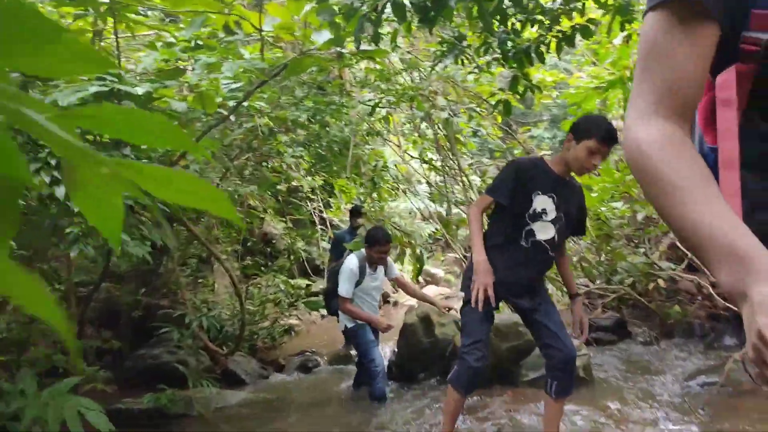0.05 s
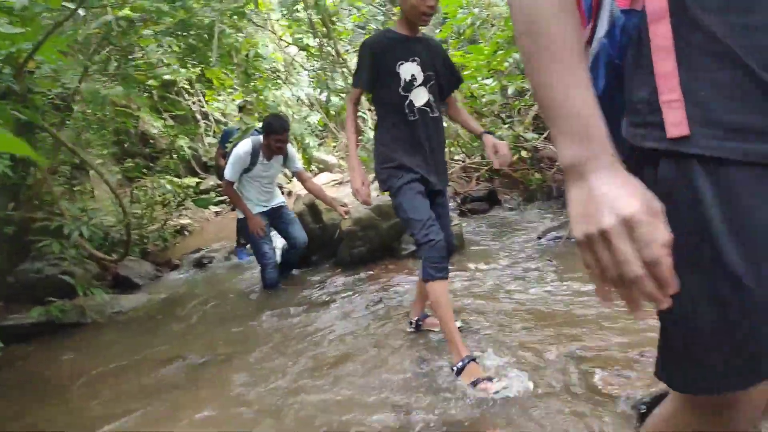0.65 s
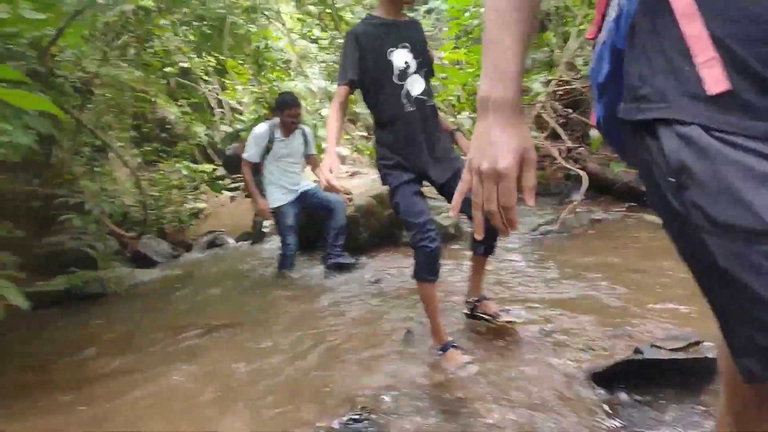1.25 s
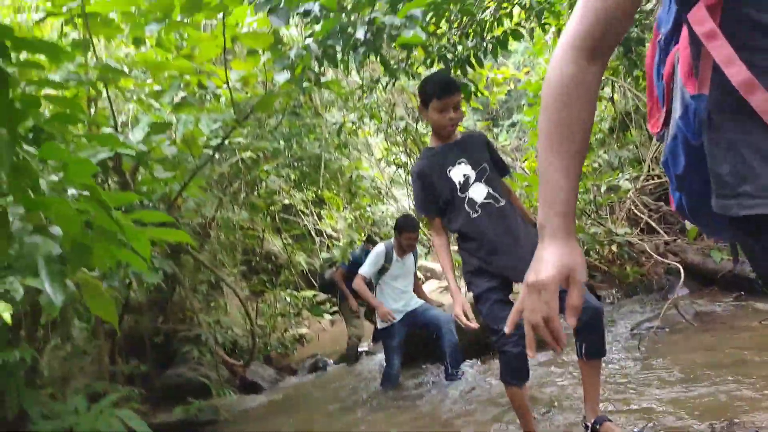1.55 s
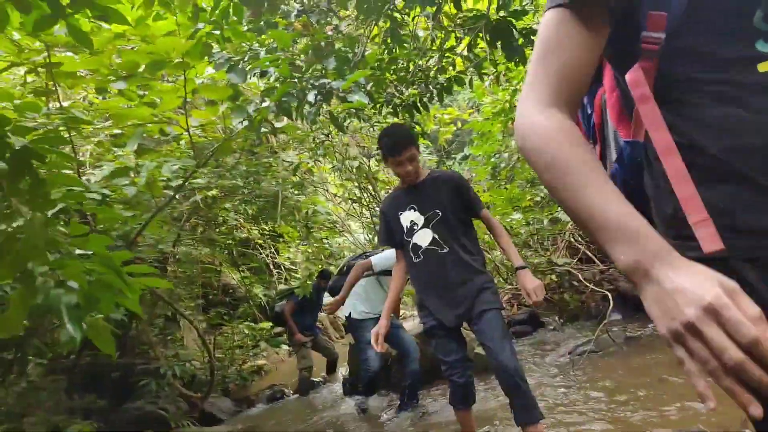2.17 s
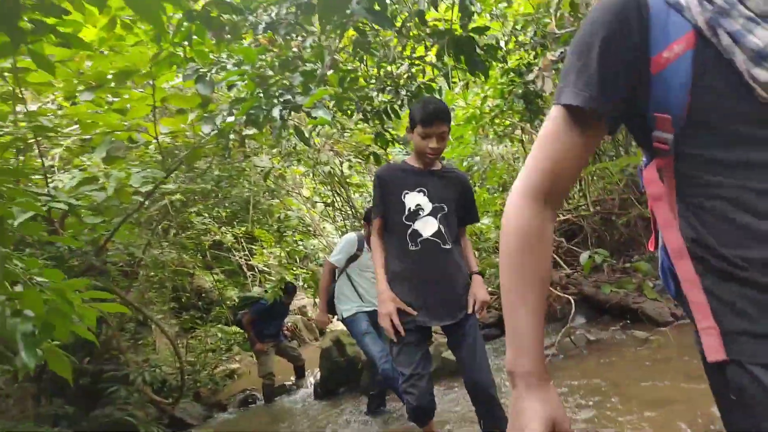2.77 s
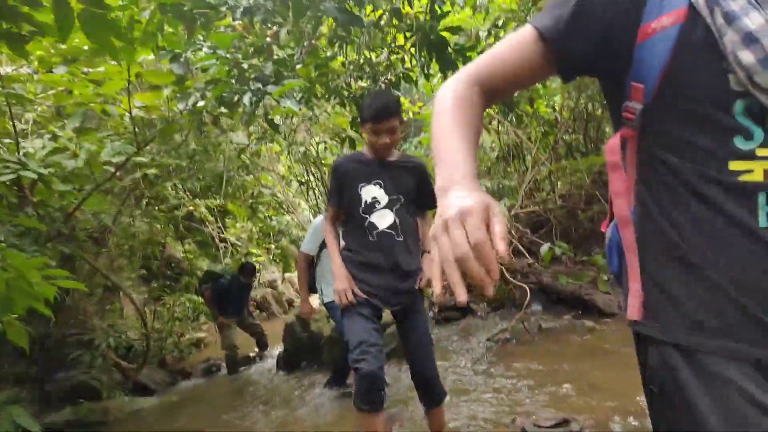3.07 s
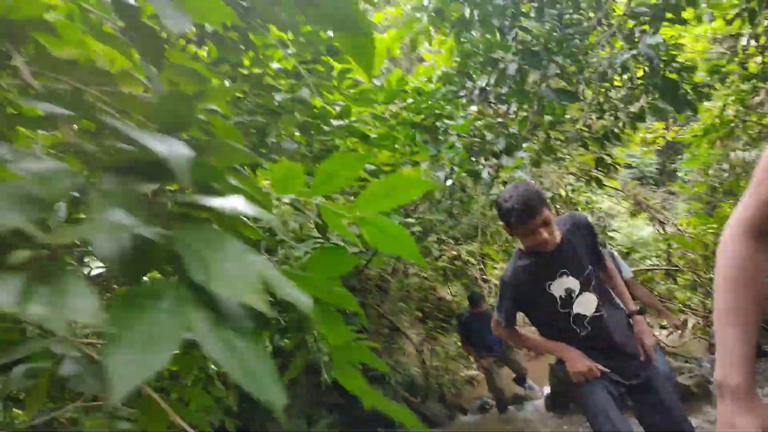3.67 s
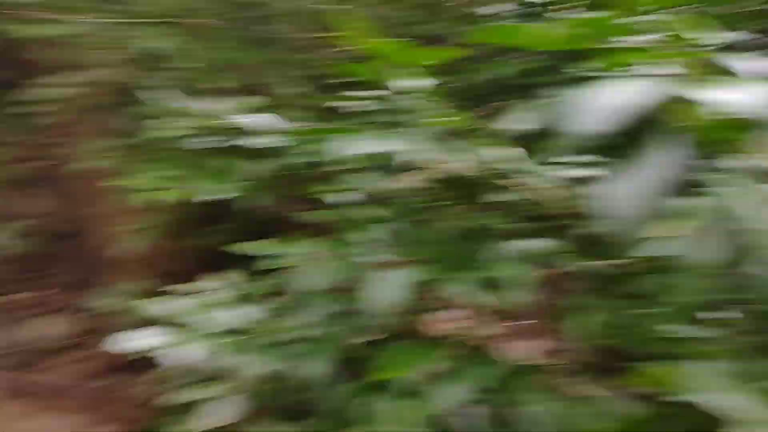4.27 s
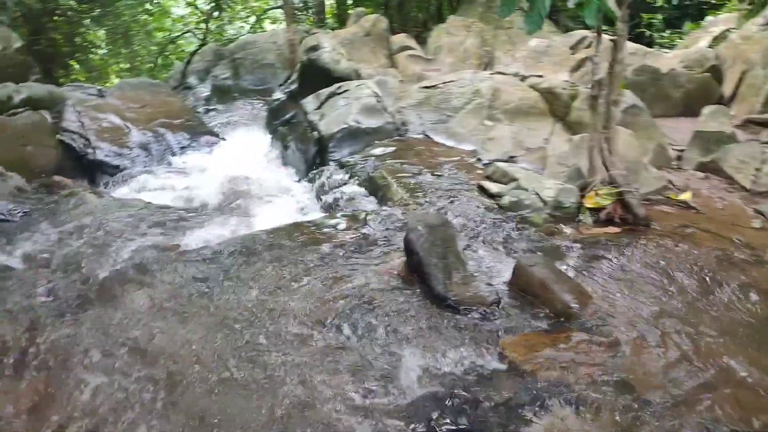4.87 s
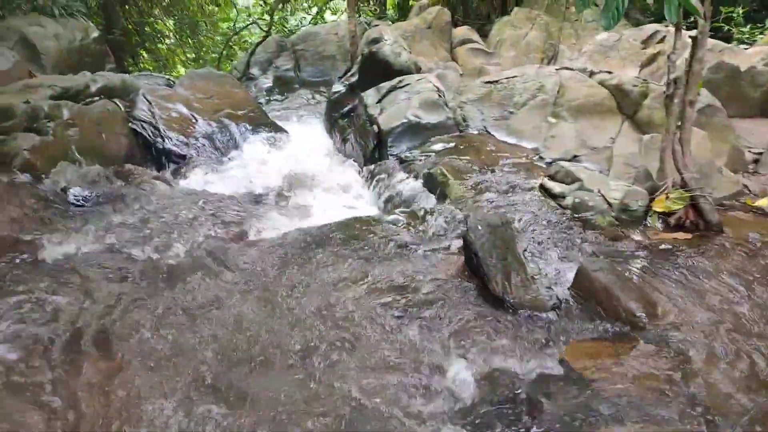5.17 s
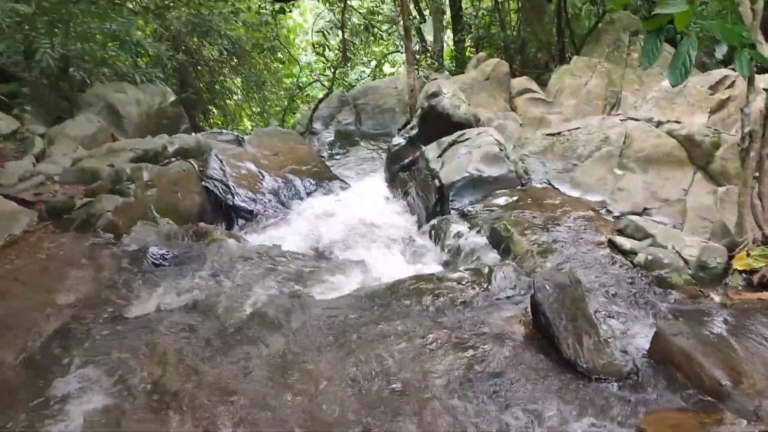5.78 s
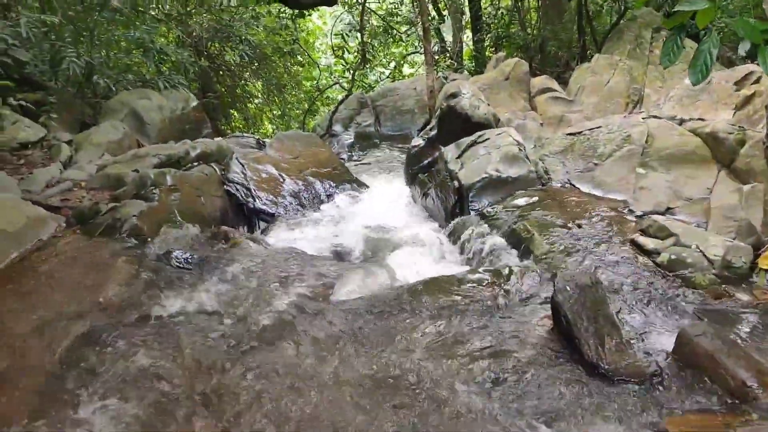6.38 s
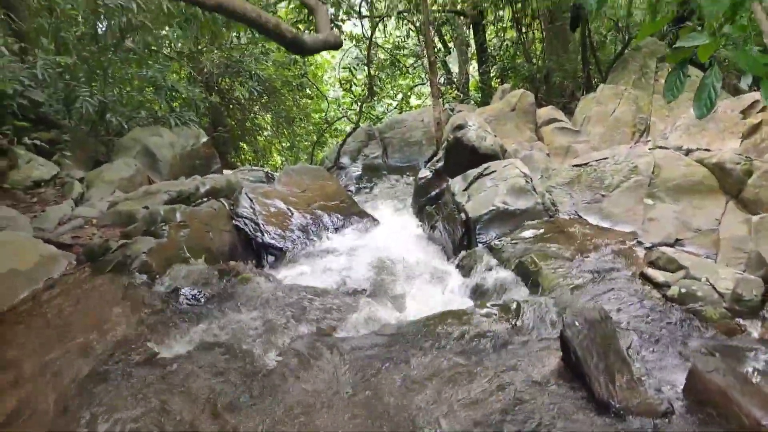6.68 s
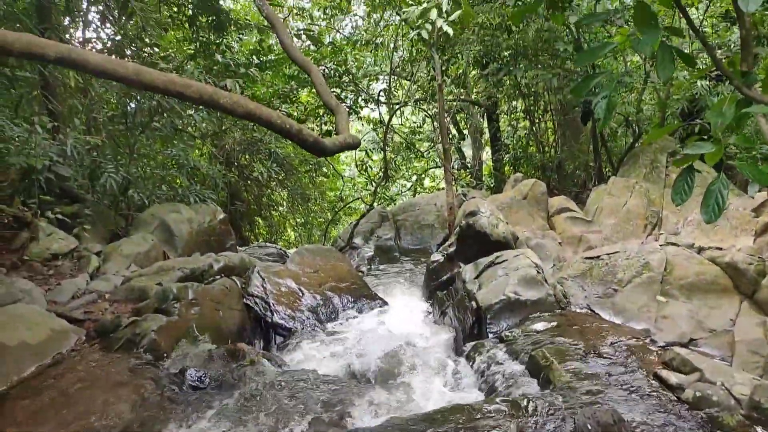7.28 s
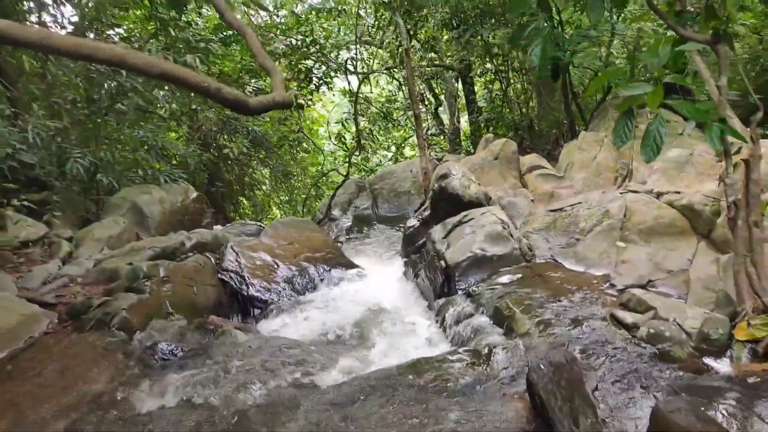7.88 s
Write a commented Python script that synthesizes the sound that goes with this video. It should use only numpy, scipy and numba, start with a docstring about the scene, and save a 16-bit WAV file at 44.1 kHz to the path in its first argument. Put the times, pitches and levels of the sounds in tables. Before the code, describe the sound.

A shallow forest stream pours over rocks into a small pool for about eight seconds, heard from the bank in wide stereo. Throughout, white water makes a steady, fizzing hiss, riffles babble over stones, and the fall plunges with a low, lumpy rumble slightly to the right. Tiny bubbles burst with short, high plinks and single drops tick close by, scattered from start to end. A low gulp comes just before 1 second, and then the whole sound cuts out for under a tenth of a second. Gurgles and hollow gulps cluster from about 2.2 to 3.8 seconds as the flow surges. Between 3 and 4.7 seconds the microphones turn toward the fall, and the water becomes slightly brighter and fuller. More gulps with soft thuds come around 4.7 to 5.2 seconds and again from 6.6 to 7.5, while the rushing continues to the end.

```python
"""A forest stream bank, where shallow water drops over rocks into a small pool.
Turbulence rumbles; ringing bubbles make the foam's hiss, the riffles' babble and the fall's plunge,
gurgles and gulps. Close by, small bubbles burst and single drops tick.
Halfway through, the microphones turn toward the fall and the foam brightens.
They are cross-fed into a wide stereo image; the sound cuts out once for an instant."""
import sys
import numpy as np
from scipy import signal
from scipy.fft import rfft, irfft, next_fast_len
from scipy.io import wavfile
from numba import njit

SR = 44100
rng = np.random.default_rng(int(sys.argv[2]) if len(sys.argv) > 2 else 0)


def put_to_file(sound):
    """Save the sound as 16-bit audio at rate SR, in the file named by the first command-line argument."""
    columns = np.atleast_2d(sound).T  # one column per channel
    safe = np.clip(columns, -1, 1)
    whole_steps = np.round(safe * 32767)
    wavfile.write(sys.argv[1], SR, whole_steps.astype(np.int16))


N = 354431
TIME_S = np.arange(N) / SR
FFT_SIZE = next_fast_len(N + 4096)
FREQ_HZ = np.maximum(np.arange(FFT_SIZE // 2 + 1) * SR / FFT_SIZE, 1)


def from_db(db):
    """Decibels to gain."""
    return 10 ** (np.asarray(db) / 20)


def unit_rms(x):
    """Scale to unit power."""
    return x / np.sqrt(np.mean(x ** 2) + 1e-20)


def over_time(points):
    """Breakpoints interpolated at every sample."""
    return np.interp(TIME_S, *np.transpose(points))


def over_hz(points):
    """Breakpoints interpolated on a log-frequency axis."""
    hz, value = np.transpose(points)
    return np.interp(np.log(FREQ_HZ), np.log(hz), value)


def peaks_db(rows):
    """Response of a set of resonances or dips."""
    return sum(db / (1 + (2 * (FREQ_HZ - hz) / width_hz) ** 2) for hz, width_hz, db in rows)


def colour(x, curve_db):
    """Filter by a decibel curve."""
    return irfft(rfft(x, FFT_SIZE) * from_db(curve_db), FFT_SIZE)[..., :N]


def band(x, hz, width_oct):
    """Band-pass around a pitch; unit power."""
    edges_hz = np.minimum(hz * 2 ** (np.array([-.5, .5]) * width_oct), .45 * SR)
    return unit_rms(signal.sosfilt(signal.butter(2, edges_hz, "band", fs=SR, output="sos"), x))


def drift(rate_hz):
    """Slow random wander; unit power."""
    spectrum = rfft(rng.standard_normal(FFT_SIZE)) / (1 + (FREQ_HZ / rate_hz) ** 2)
    return unit_rms(irfft(spectrum, FFT_SIZE)[:N])


def swell(start_s, db, rise_s):
    """Envelope that builds for `rise_s`, then settles."""
    age = np.maximum(TIME_S - start_s, 0) / rise_s
    return from_db(db) * age * np.exp(1 - age)


@njit
def ring_bubbles(starts, sides, pitches, heights, lives, rises):
    """Decaying sines, each gliding up as its bubble nears the surface; time in samples."""
    out = np.zeros((2, N))
    for k in range(len(starts)):
        phase, height = 0., heights[k]
        fade = np.exp(-np.log(1000) / lives[k])
        for i in range(min(int(lives[k]), N - starts[k])):
            out[sides[k], starts[k] + i] += height * np.sin(phase)
            phase += 2 * np.pi * pitches[k] * (1 + rises[k] * i / lives[k])
            height *= fade
    return out


def bubbles(per_s, low_hz, high_hz, cycles, spread_db, rise):
    """Swarm of random-sized bubbles, as strong per Hz as unit white noise within its range."""
    when, side, size, strength, life, glide = rng.random((int(per_s * N / SR), 6)).T
    starts, sides = (when * N).astype(np.int64), (side * 2).astype(np.int64)
    hz = low_hz * (high_hz / low_hz) ** size
    heights = hz * from_db(spread_db * np.minimum(-np.log(1 - strength), 4))
    lives = cycles * (.5 + life) * SR / hz
    swarm = ring_bubbles(starts, sides, hz / SR, heights, lives, rise * glide)
    return unit_rms(swarm) * np.sqrt(2 * (high_hz - low_hz) / SR)


def water(near, near_db, curve_db, churn_db, churn_hz):
    """Near bubbles over the blur of far ones, swelling together as the flow churns; unit power."""
    blend = rng.standard_normal((2, N)) + from_db(near_db) * near
    return unit_rms(colour(blend, curve_db) * from_db(churn_db * drift(churn_hz)))


def close_bubbles(rows, swell_cycles, cycles, rise, rough):
    """Single bubbles swell, ring and glide up, jostled by the current, each at one microphone."""
    out = np.zeros((2, N))
    sides = rng.integers(0, 2, len(rows))
    for (start_s, db, hz), side in zip(rows, sides):
        start = int(start_s * SR)
        turns = np.arange(min(int(cycles * SR / hz), N - start)) * hz / SR
        envelope = (1 - np.exp(-turns / swell_cycles)) ** 2 * np.exp(-np.log(1000) * turns / cycles)
        jolts = rough * rng.standard_normal((2, 64))   # one per cycle
        gain_jitter, phase_jitter = (np.interp(turns, np.arange(64), j) for j in jolts)
        phase = 2 * np.pi * turns * (1 + rise * turns / cycles) + phase_jitter
        tone = (1 + gain_jitter) * np.sin(phase)
        out[side, start:start + len(turns)] += from_db(db) * envelope / envelope.max() * tone
    return out


# pool turbulence spectrum: f/Hz, level/dB
RUMBLE_SPECTRUM = [(20, -24), (40, -7), (65, 7), (95, 16), (130, 2), (250, -13)]
def rumble(surge_db, thuds):
    """Turbulence in the pool makes a lumpy bass that follows the flow and heaves with each thud."""
    bass = colour(rng.standard_normal((2, N)), over_hz(RUMBLE_SPECTRUM))
    lumps = from_db(1.6 * drift(rate_hz=8.8))
    return np.hypot(from_db(-78.5 + 1.1 * surge_db), thuds) * unit_rms(bass * lumps)


# foam spectrum: f/Hz, level/dB
FOAM_SPECTRUM = [(1200, -20), (2300, -7.5), (3300, -1.0), (5100, -1.6), (6800, -1.8), (7700, -5),
                 (9700, -5.2), (11000, -11.7), (13000, -18), (15500, -30.5)]
# white-water vigour: t/s, level/dB
FOAM_VIGOUR = [(0, -2), (0.35, 0), (0.7, -1.5), (1.3, -1.5), (1.7, -1.3), (2.05, -2.4), (2.65, 0.2),
               (3.6, -0.4), (3.95, 0.6), (4.4, -0.7), (5.0, 0.1), (5.3, -0.9), (5.8, -1.8), (6.8, -1.8),
               (6.95, -1), (7.15, 0), (7.7, 0.9), (8.04, -1)]
def foam(spray):
    """Tiny bubbles fizz in white water; nearer ones prickle, droplets tick, spray lifts the hiss."""
    fizz = bubbles(per_s=5500, low_hz=2493, high_hz=14280, cycles=59, spread_db=1.5, rise=0.033)
    prickle = bubbles(per_s=90, low_hz=2960, high_hz=8270, cycles=60, spread_db=2.0, rise=0.051)
    droplets = bubbles(per_s=15, low_hz=4140, high_hz=10500, cycles=17, spread_db=2.0, rise=0.03)
    near = fizz + from_db(-6) * prickle + from_db(-14) * droplets
    hiss = water(near, near_db=-3.5, curve_db=over_hz(FOAM_SPECTRUM), churn_db=1.1, churn_hz=17)
    return np.hypot(from_db(-48 + over_time(FOAM_VIGOUR)), spray) * hiss


# riffle spectrum: f/Hz, level/dB
RIFFLE_SPECTRUM = [(300, -50), (700, -5), (1030, 1.5), (1400, -0.6), (1900, -1.7), (2300, -2.6),
                   (3000, -6.5), (4500, -10), (9000, -32)]
# riffle nearness: t/s, level/dB
RIFFLE_NEARNESS = [(0, 0.5), (0.45, 0), (0.7, -0.2), (1.4, -1.0), (2.1, -0.4), (3.2, 1.1), (3.9, 1.3),
                   (4.4, 0.1), (5.0, 1.6), (5.35, -0.9), (6.0, -1.4), (7.3, 0.1), (8.04, -1)]
def riffles():
    """Mid-sized bubbles babble where water folds over stones; a few nearer ones ring as notes."""
    swarm = bubbles(per_s=1500, low_hz=601.4, high_hz=4025, cycles=40, spread_db=2.0, rise=0.23)
    notes = bubbles(per_s=60, low_hz=887.6, high_hz=3310, cycles=160, spread_db=1.9, rise=0.1)
    near = swarm + from_db(-3.5) * notes
    babble = water(near, near_db=-1.5, curve_db=over_hz(RIFFLE_SPECTRUM), churn_db=0.5, churn_hz=19)
    return from_db(-48.5 + over_time(RIFFLE_NEARNESS)) * babble


# small bursting bubbles: t/s, level/dB, f/Hz
BURSTS = [(0.858, -35, 5130), (2.2446, -33, 5670), (3.059, -35, 5960), (3.1948, -33, 5000),
          (3.3842, -32, 5700), (4.966, -33, 5300), (5.5194, -36, 5100), (6.0164, -33, 5040),
          (6.0422, -33, 5810), (6.396, -30, 5900), (6.4188, -36, 5940), (6.5786, -30, 6260),
          (6.968, -32, 6100), (7.085, -37, 5500), (7.893, -37, 5500)]
def plinks():
    """Small bubbles burst close by with a short, high ring."""
    return close_bubbles(BURSTS, swell_cycles=0.77, cycles=28, rise=0.055, rough=0.15)


def spray_envelope():
    """Each bursting bubble throws a puff of spray."""
    return sum(swell(start_s, db - 17.5, rise_s=0.0099) for start_s, db, _ in BURSTS)


# drops landing close by: t/s, level/dB, f/Hz
LANDINGS = [(0.3294, -29, 6000), (0.3409, -27, 9250), (0.5098, -30, 9700), (1.587, -26, 8800),
            (1.6353, -35, 10000), (1.7558, -29, 9500), (2.1048, -32, 5200), (2.632, -30, 6500),
            (3.9386, -28, 7340), (4.948, -37, 6300), (5.6392, -28, 7000), (6.6453, -34, 9400),
            (6.943, -28, 4700), (7.0434, -29, 8500), (7.6744, -34, 9100), (7.9555, -32, 9500)]
def drops(spatter_db=-20, spatter_t60_s=0.15, width_oct=0.43):
    """Each drop lands with one sharp tick; a fine spatter falls back after it."""
    out, t = np.zeros((2, N)), TIME_S[:SR // 5]
    decay = np.exp(-np.log(1000) * t / spatter_t60_s)
    for (start_s, db, hz), side in zip(LANDINGS, rng.integers(0, 2, len(LANDINGS))):
        tick = band(signal.unit_impulse(len(t)), hz, width_oct)
        spatter = band(rng.laplace(size=len(t)), hz, width_oct) * decay
        landing = tick / np.abs(tick).max() + from_db(spatter_db) * spatter
        start = int(start_s * SR)
        out[side, start:start + len(t)] += from_db(db) * landing[:N - start]
    return out


# big air pockets: t/s, level/dB, f/Hz, thud level/dB
AIR_POCKETS = [(0.47, -46, 178, -85), (0.978, -36, 215.5, -85), (1.723, -39, 188, -82),
               (2.46, -38, 174, -77), (2.64, -40, 169, -79), (2.725, -39, 168, -72), (2.85, -38, 176, -60),
               (3.11, -47, 172, -68), (3.178, -36, 171, -79), (3.565, -38.5, 179, -85),
               (3.635, -38, 232, -85), (3.719, -36.5, 180, -80), (4.715, -40.5, 232, -85),
               (4.86, -38.5, 150, -60), (5.01, -40, 149, -62), (5.159, -52, 166, -61),
               (6.581, -37, 180, -65), (7.195, -43, 133, -70), (7.334, -37.5, 175, -73),
               (7.385, -40, 222, -77), (7.532, -37.5, 160.7, -70)]
def gulps():
    """Big air pockets ring low as the pool swallows them."""
    rings = [(start_s, db, hz) for start_s, db, hz, _ in AIR_POCKETS]
    return close_bubbles(rings, swell_cycles=1.5, cycles=20.3, rise=0.04, rough=0.2)


def thud_envelope():
    """The pool heaves just after each gulp begins."""
    return sum(swell(start_s, db, rise_s=0.033) for start_s, _, _, db in AIR_POCKETS)


# slugs of water tumbling into the basin: t/s, level/dB, f/Hz
SLUGS = [(0.95, -50, 250), (1.52, -55.5, 340), (2.2, -50.5, 210), (2.42, -52, 340), (2.58, -53, 320),
         (2.71, -43.5, 225), (3.28, -49, 228), (3.77, -53, 302), (4.19, -48.5, 300), (4.63, -52, 340),
         (4.87, -52, 290), (4.98, -56, 330), (7.0, -51, 190), (7.26, -49, 198)]
def gurgles():
    """Each slug breaks into a dense cluster of rising bubbles around its own pitch."""
    swarm = bubbles(per_s=960, low_hz=153, high_hz=588, cycles=16, spread_db=2.0, rise=0.097)
    churn = rng.standard_normal((2, N)) + from_db(3) * swarm
    return sum(swell(start_s, db, rise_s=0.035) * band(churn, hz, width_oct=0.83)
               for start_s, db, hz in SLUGS)


# plunge spectrum: f/Hz, level/dB
PLUNGE_SPECTRUM = [(50, -35), (100, -18), (140, -8), (200, -3.5), (310, -4), (400, -7.5), (530, -6),
                   (720, -10), (1000, -14.5), (2000, -32)]
# bubble-cloud resonances in the rock basin: f/Hz, width/Hz, level/dB
BASIN_MODES = [(173, 18, 11), (229, 22, 5.5), (310, 34, 2.5)]
def plunge(surge_db):
    """The fall drives large bubbles into the basin, which rings with them."""
    swarm = bubbles(per_s=500, low_hz=127, high_hz=788, cycles=18, spread_db=0.5, rise=0.15)
    basin_db = over_hz(PLUNGE_SPECTRUM) + peaks_db(BASIN_MODES)
    ringing = water(swarm, near_db=-6, curve_db=basin_db, churn_db=0.5, churn_hz=7)
    return from_db(-48.5 + 0.45 * surge_db) * ringing


# flow over the fall, relative to usual: t/s, level/dB
FLOW_SURGES = [(0, 1), (0.5, 3), (0.8, -1), (1.25, 1.5), (2.0, -1.5), (2.7, 4), (3.65, 3.5), (4.4, 0.6),
               (4.95, 2), (5.4, -2.5), (6.1, -3.5), (6.6, 1), (7.35, 0.5), (7.75, -5.5), (8.04, 0)]
def waterfall():
    """Water surges into the pool, a little to the right."""
    surge_db = over_time(FLOW_SURGES)
    pan = from_db([[-.6], [.6]])
    return pan * (rumble(surge_db, thud_envelope()) + plunge(surge_db) + gurgles())


# lift when facing the fall: f/Hz, width/Hz, level/dB
FACING_PEAKS = [(90.5, 50, 2), (2260, 2900, 0.7), (4930, 5000, 1.5)]
def turn_toward_fall(x, start_s, length_s):
    """The water gains depth and brightness as the microphones come round."""
    facing = np.clip((TIME_S - start_s) / length_s, 0, 1)
    return (1 - facing) * x + facing * colour(x, peaks_db(FACING_PEAKS))


def scene():
    """The stream as it reaches the two microphones."""
    stream = waterfall() + foam(spray_envelope()) + riffles()
    return turn_toward_fall(stream, start_s=3, length_s=1.7) + gulps() + plinks() + drops()


# microphone response dips: f/Hz, width/Hz, level/dB
MIC_DIPS = [(790, 90, -7.5), (8230, 550, -4.5)]
# feed into the opposite channel: f/Hz, share/1
CROSSFEED_SHARE = [(50, .63), (170, .70), (500, .54), (1000, .6), (2000, .8), (2700, .97), (3600, .88),
                   (5400, .81), (8000, .99), (10000, .9), (13400, .99)]
# brief cut-out: t/s, level/dB
DROPOUT = [(1.019, 0), (1.020, -17), (1.055, -58), (1.080, -58), (1.099, -20), (1.103, 0)]
CROSSFEED_LAG_S, LOWPASS_HZ = .0001875, 15700
def record(dry):
    """Each channel also takes the other microphone a moment late; one cut-out; steep low-pass."""
    mics = rfft(colour(dry, peaks_db(MIC_DIPS)), FFT_SIZE)
    share = over_hz(CROSSFEED_SHARE)
    lag = np.exp(-2j * np.pi * FREQ_HZ * CROSSFEED_LAG_S)
    crossfed = (mics + share * lag * mics[::-1]) / np.sqrt(1 + share ** 2)
    wide = irfft(crossfed, FFT_SIZE)[:, :N]
    lowpass = signal.ellip(12, .1, 80, LOWPASS_HZ, fs=SR, output="sos")
    return signal.sosfilt(lowpass, wide * from_db(over_time(DROPOUT)))


dry = scene()
out = record(dry)
put_to_file(out)
```